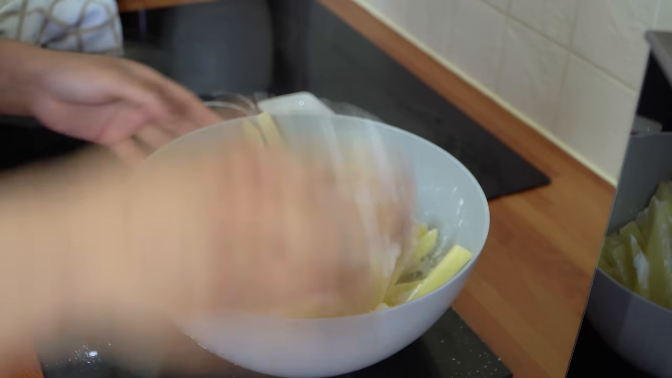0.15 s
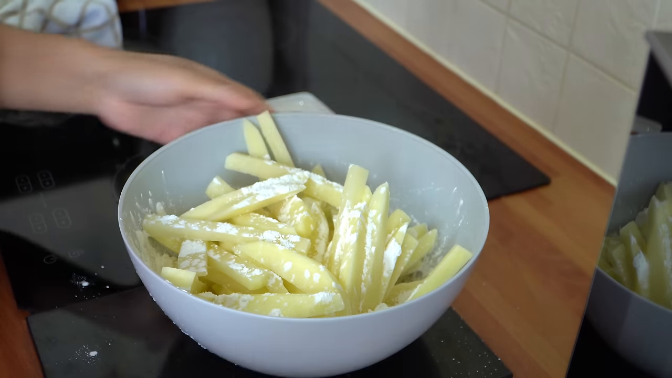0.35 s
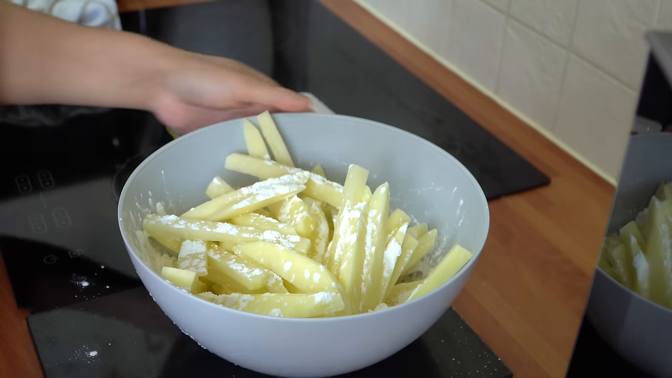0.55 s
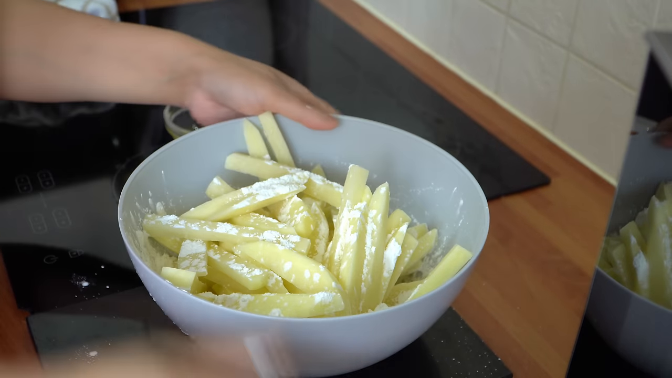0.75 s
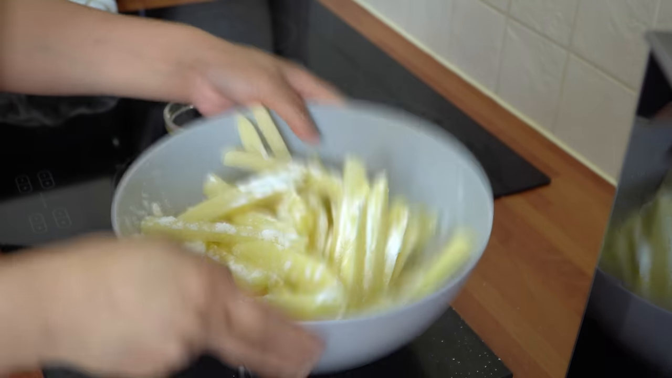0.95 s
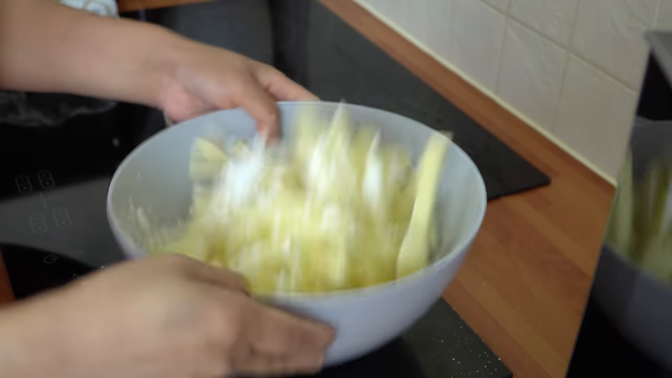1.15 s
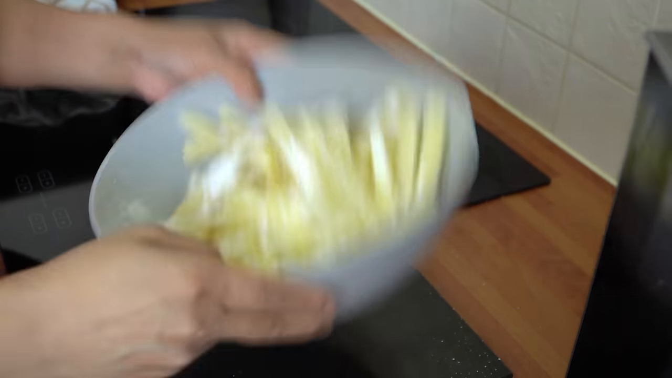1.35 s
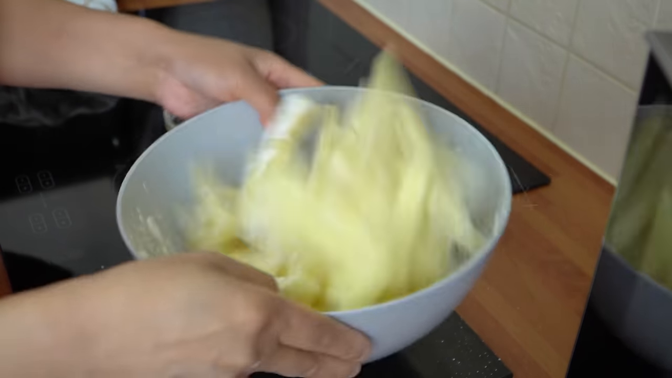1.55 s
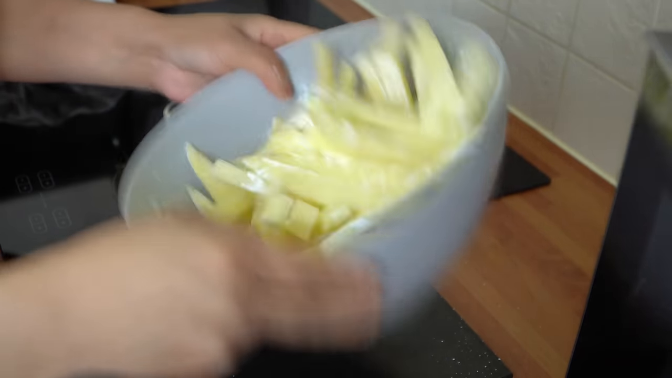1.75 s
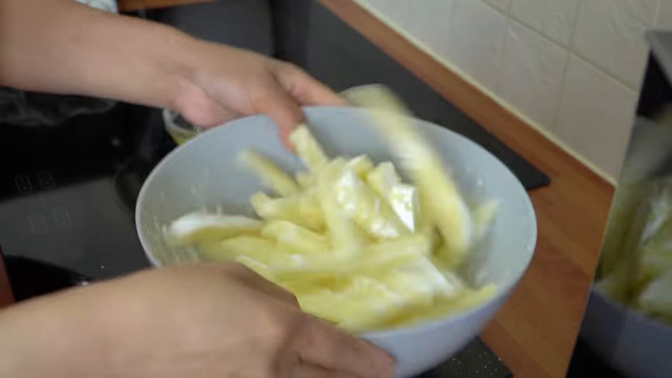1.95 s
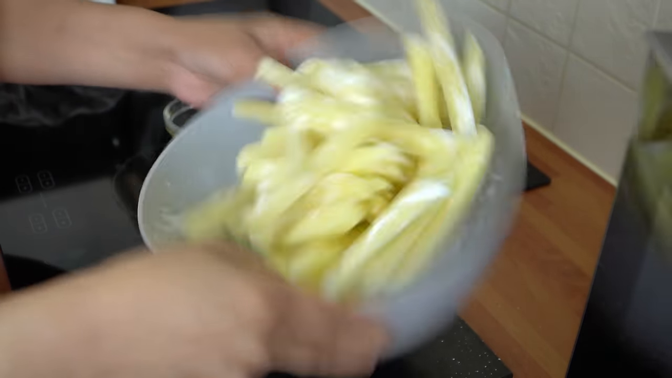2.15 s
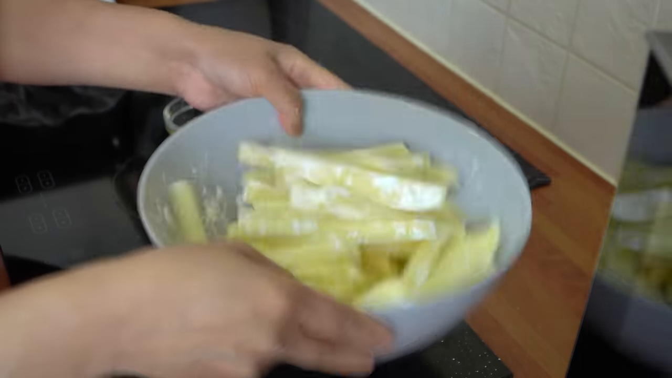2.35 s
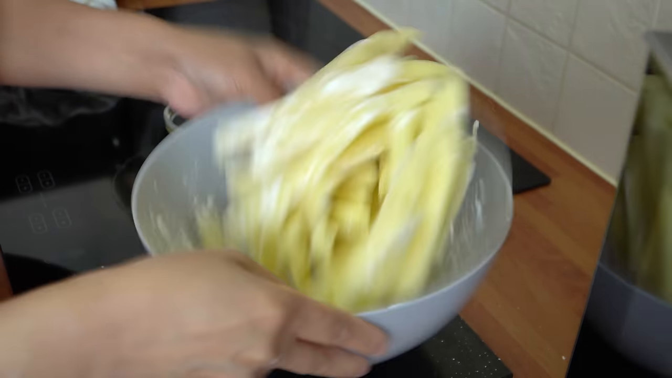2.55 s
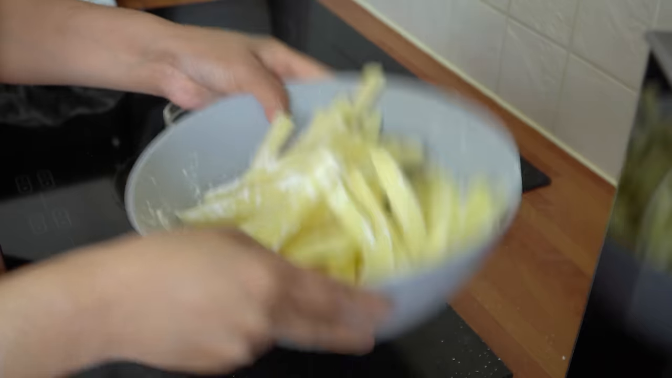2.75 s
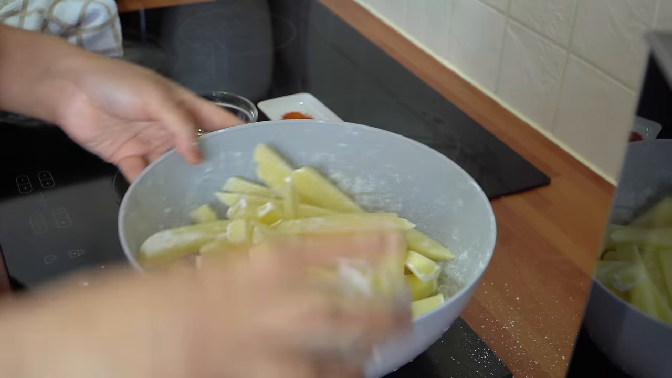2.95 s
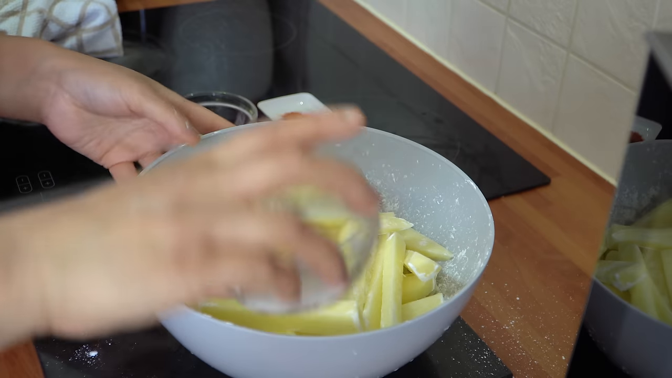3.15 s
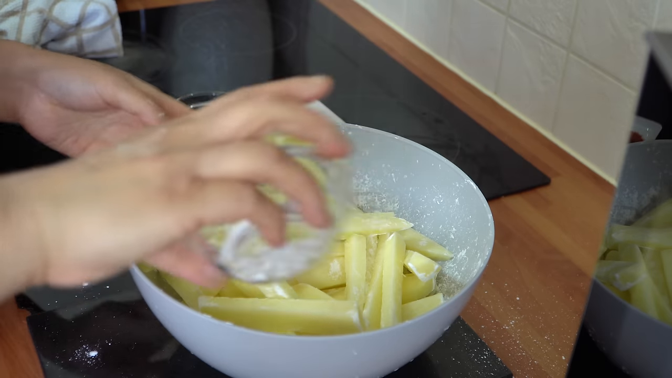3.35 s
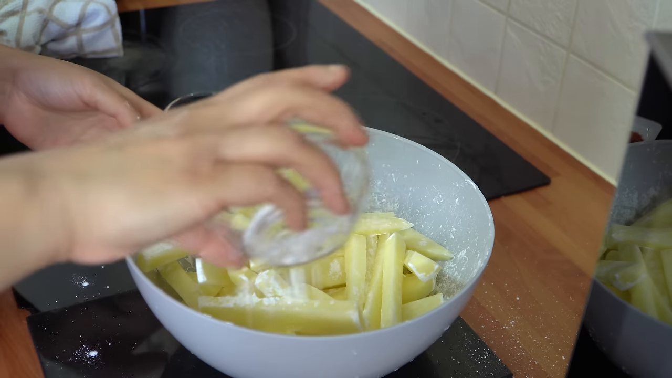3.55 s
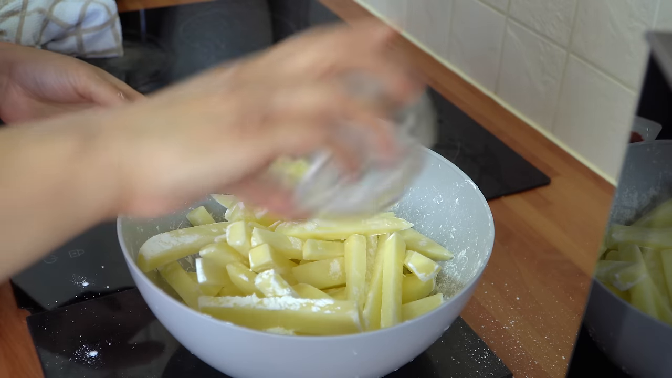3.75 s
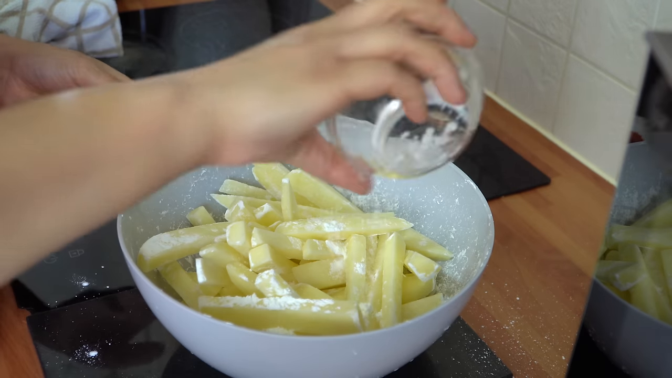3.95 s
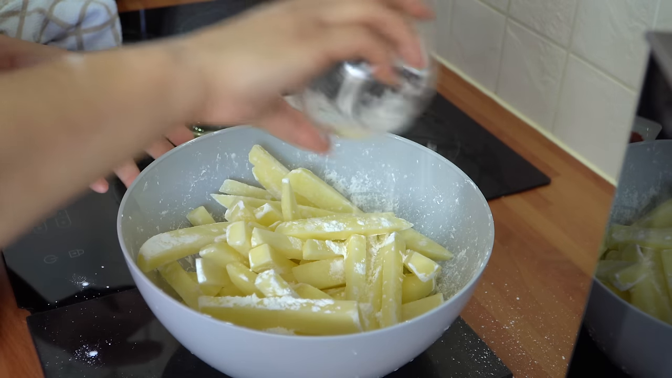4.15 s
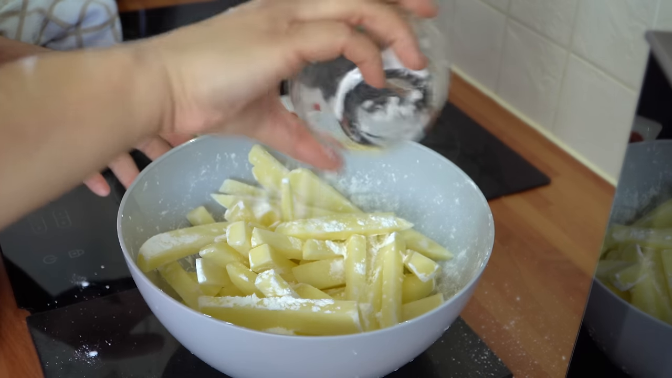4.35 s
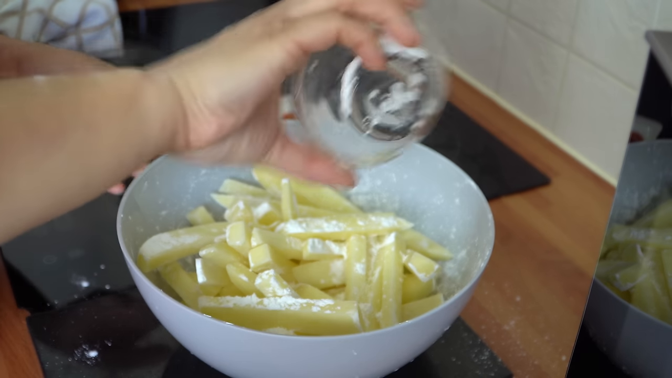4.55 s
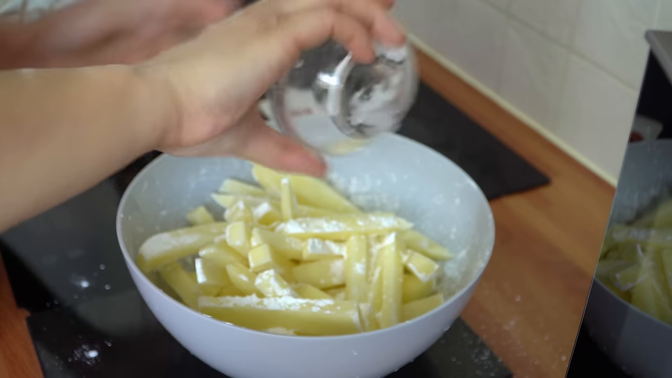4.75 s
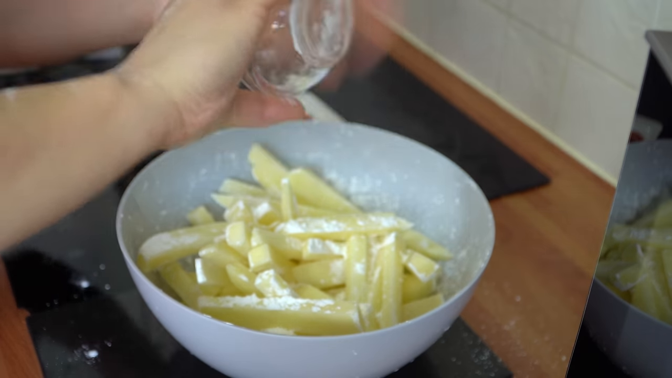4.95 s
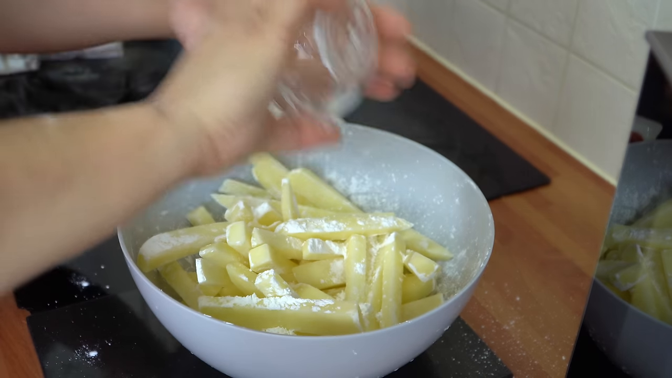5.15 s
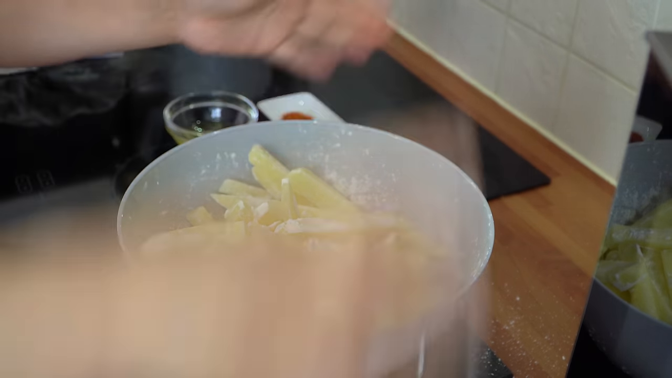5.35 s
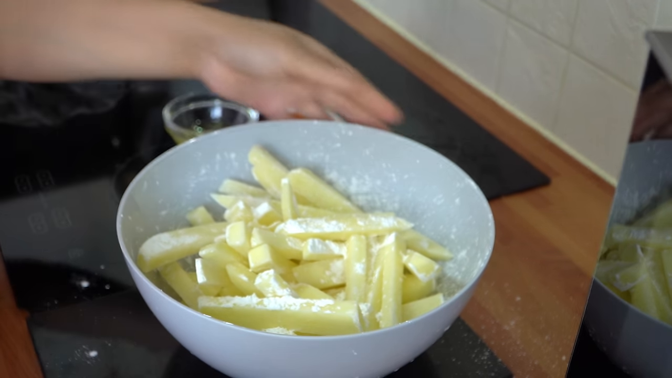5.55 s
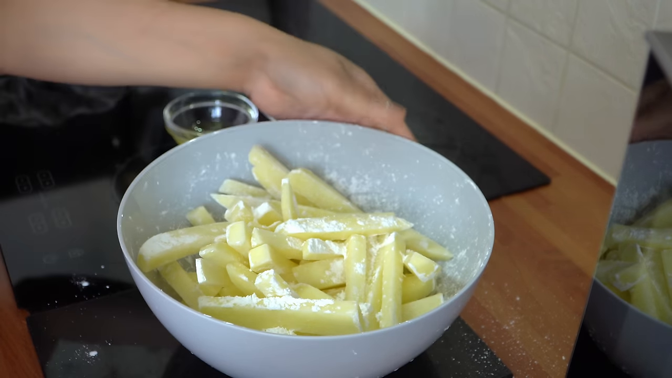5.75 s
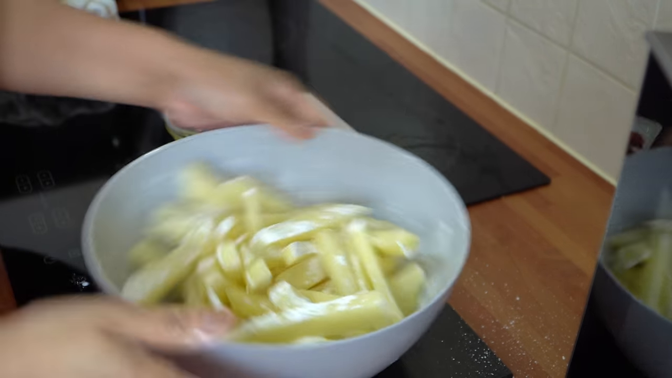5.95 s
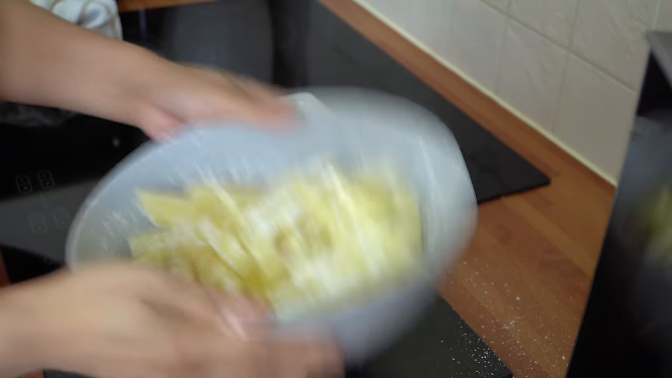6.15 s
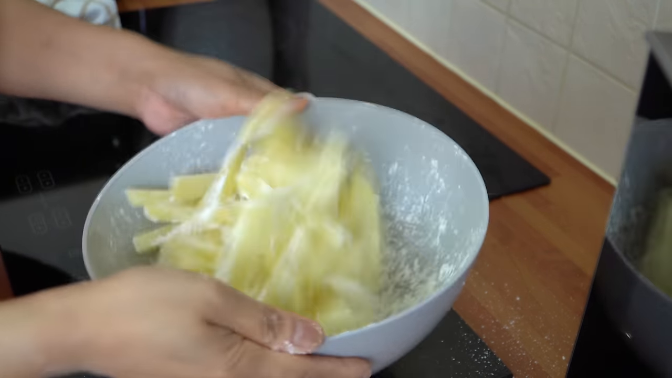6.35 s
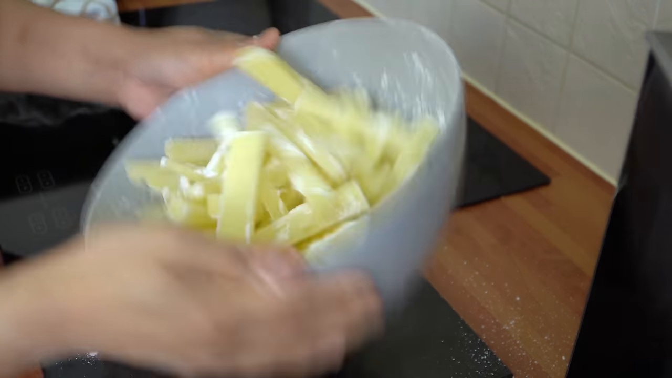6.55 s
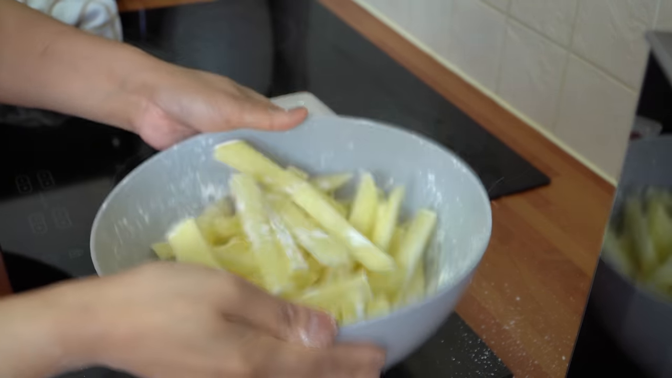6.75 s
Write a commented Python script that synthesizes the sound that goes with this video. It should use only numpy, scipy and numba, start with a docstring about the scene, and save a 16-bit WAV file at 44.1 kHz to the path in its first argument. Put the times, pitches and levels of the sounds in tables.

```python
"""A sleeve rustles over a low kitchen hush; a plastic bowl knocks on the glass hob and judders off it.
Raw floured potato chips are then tossed in it: each toss lands as a slap and a tumble of single chips.
After a pause a little glass flour dish is put down, the bowl knocks on the hob again and two tosses follow.
Blows are short forces filtered by resonant bodies; rubbing is a patter of random tiny contacts filtered
alike. Tiled walls answer, and a limiter flattens the loud blows."""
import sys
import numpy as np
from scipy import signal
from scipy.fft import rfft, irfft, next_fast_len
from scipy.io import wavfile
from scipy.ndimage import minimum_filter1d, map_coordinates
from numba import njit

SR = 44100
rng = np.random.default_rng(int(sys.argv[2]) if len(sys.argv) > 2 else 0)


def log_audio(samples):
    """Write samples as a 16-bit WAV file to the path given in sys.argv[1]."""
    # one column per channel
    frames = np.atleast_2d(samples).T
    # limit to full scale, then quantise
    limited = np.clip(frames, -1, 1)
    pcm = np.round(limited * 32767).astype(np.int16)
    wavfile.write(sys.argv[1], SR, pcm)


N = 303319
TIME = np.arange(N) / SR  # s

# Spectra are relative: each row: frequency in Hz, level in dB.
# Resonances stand on a spectrum: each row: frequency in Hz, width in Hz, lift in dB.
# Strokes swell and fade: each row: time at the height in s, half length in s, level in dB.

# Low room and handling noise. Each row: time in s, level in dB.
HUSH_LEVEL = [(0, -48.5), (2.8, -48), (2.88, -60), (4.75, -61.5), (4.9, -49.5), (5.3, -54.5), (6.88, -49)]
# Spectrum of that noise. Each row: frequency in Hz, level in dB.
HUSH_SPECTRUM = [(20, -7.5), (110, -4), (200, -13), (360, -6.5), (480, -15.5), (1500, -22.5), (9000, -27.5),
                 (16000, -49.5)]
# Spectrum of the even rumble of the house. Each row: frequency in Hz, level in dB.
RUMBLE_SPECTRUM = [(40, -1.5), (130, -4), (600, -43)]

# Reverberation of the kitchen. Each row: frequency in Hz, time to decay by 60 dB in s.
KITCHEN_T60 = [(100, 0.38), (300, 0.29), (700, 0.26), (1900, 0.3), (5000, 0.27), (14000, 0.073)]
LOAD_ROOM_DB, BOWL_ROOM_DB, DISH_ROOM_DB = -10.5, -1.5, -8  # how much of each the walls send back

# The arm moves and its sleeve brushes. Each row: time at the height in s, half length in s, level in dB.
ARM_STROKES = [(.5, 0.13, -49), (1.0, .1, -42), (1.502, .016, -42), (3.28, 0.11, -54), (4.1, 0.13, -60),
               (4.93, .06, -44.5), (5.12, .04, -47.5), (5.36, 0.086, -51), (5.66, 0.075, -49),
               (6.02, 0.045, -44)]
# Spectrum of rubbed cloth. Each row: frequency in Hz, level in dB.
CLOTH_SPECTRUM = [(200, -23), (2000, -17.5), (2600, -10.5), (3150, 3.5), (3900, -7.5), (4700, -6.5),
                  (6000, -11.5), (9000, -12.5), (10500, -21), (16000, -25.5)]
SWING_LEAD_S, SWING_HALF_S = 0.042, 0.05  # the sleeve brushes as the bowl swings up for each toss
FIDGET_DB = -64.5  # the sleeve is never quite still
# Fingers and crumbs tick. Each row: time in s, peak level in dB.
TICK_EVENTS = [(0.111, -32), (0.826, -21), (3.271, -32), (3.533, -33), (3.580, -20), (6.255, -24.5),
               (6.666, -28)]
# Chips and flour shift softly. Each row: time at the height in s, half length in s, level in dB.
LOAD_STROKES = [(.04, 0.12, -51), (.45, 0.074, -64), (2.95, 0.09, -55.5), (3.69, .11, -53.5),
                (4.93, 0.066, -69), (5.98, 0.058, -38.5), (6.13, 0.073, -40.5)]
# Spectrum of the shifting load. Each row: frequency in Hz, level in dB.
LOAD_SPECTRUM = [(100, -27.5), (380, 3.5), (480, -6), (600, 4), (790, -5.5), (2100, -6.5), (5000, -16),
                 (16000, -29)]

# The hand takes the bowl's weight. One row: time in s, peak level in dB.
HAND_PUSH = (1.098, -7)
# Spectrum of the soft palm. Each row: frequency in Hz, level in dB.
PALM_SPECTRUM = [(15, -27), (40, -7), (80, -8.5), (160, -15.5), (350, -12.5), (600, -21), (1200, -38.5),
                 (4000, -74)]

# The flour dish meets the worktop. Each row: time in s, knock in dB, clink in dB.
DISH_CONTACTS = [(5.0201, -7.5, -24), (5.1821, -15.5, -21.5)]
# Spectrum of the worktop. Each row: frequency in Hz, level in dB.
WORKTOP_SPECTRUM = [(30, -7.5), (130, -7), (300, 0), (400, 1), (500, -17), (750, -2), (1000, 2),
                    (1500, -14), (2250, -10), (2800, -37), (16000, -51.5)]
# Spectrum of the glass dish. Each row: frequency in Hz, level in dB.
GLASS_SPECTRUM = [(500, -30.5), (3000, -1.5), (5000, -3), (9000, -6), (11000, -14), (16000, -28)]
# Resonances of the glass dish. Each row: frequency in Hz, width in Hz, lift in dB.
GLASS_RESONANCES = [(5030, 200, 10), (5240, 160, 10), (9260, 220, 10), (9520, 260, 9)]

# The bowl's foot hits or catches on the hob. Each row: time in s, peak level of the first hit in dB.
FOOT_KNOCKS = [(0.5725, 10), (0.759, -11.5), (0.9261, -6), (5.713, 8.5)]
# Spectrum of bowl and glass top together. Each row: frequency in Hz, level in dB.
HOB_SPECTRUM = [(30, -24), (250, -0.5), (480, -2), (700, 1), (1200, 8.5), (1850, -1.5), (2400, -9),
                (3000, -16.5), (3600, -20.5), (5000, -30), (7200, -33), (10000, -38.5), (16000, -54.5)]
# Resonances of bowl and glass top. Each row: frequency in Hz, width in Hz, lift in dB.
HOB_RESONANCES = [(583.6, 40, 7.5), (745, 55, 7.5), (1799, 50, 4.5), (2246, 8.3, 5.5), (4193, 1100, -0.5),
                  (5800, 600, 11), (7220, 710, 8.5), (13060, 600, 8)]
# Spectrum of the juddering foot. Each row: frequency in Hz, level in dB.
JUDDER_SPECTRUM = [(40, -18.5), (200, -9.5), (400, -2), (600, 1), (1250, 1.5), (1600, -14.5), (2500, -20),
                   (16000, -68)]
# The foot bites and grates. Each row: time at the height in s, half length in s, level in dB.
GRATE_STROKES = [(.605, 0.012, -14), (.958, 0.031, -18.5), (5.735, 0.01, -14)]
ROLL_S, ROLL_DB = .001, -4.5  # after each hit the foot rolls along its rim: delay, relative level
DRAG_S, LIFT_S, LIFT_T60_S = .6, 0.9, 0.18  # the foot slides over the glass, then leaves it
JUDDER_DB, JUDDER_RISE_DB = -31.5, 8.5  # the judder grows as the pull quickens

# The bowl swings up and the heap falls back. Each row: landing in s, tumbling time in s,
# strength in dB, flour swish in dB at the landing, sleeve in dB.
TOSS_EVENTS = [(1.198, .105, -2.5, -40.5, -42), (1.551, .11, 1, -31.5, -52), (1.904, .105, -0.5, -34, -47),
               (2.271, 0.11, 4, -44, -51.5), (2.635, .1, 0, -37.5, -48.5), (6.351, .125, -0.5, -39.5, -53),
               (6.702, 0.074, -4.5, -36.5, -47.5)]
# Stray chips hit the bowl hard or on their own. Each row: time in s, thud in dB, clack in dB, snap in dB.
STRAY_CHIPS = [(1.167, -13, -29.5, -31.5), (1.19, -5, -15.5, -22), (1.212, 4, -13.5, -22.5),
               (1.247, 0.5, -15.5, -32), (1.279, -1.5, -1.5, -27), (1.627, -0.5, -0.5, -19),
               (1.693, -7.5, -5, -31), (1.997, 2.5, -4, -16.5), (2.086, -7.5, -16.5, -41),
               (2.367, -9.5, -18, -35.5), (2.415, -18.5, -9.5, -26.5), (2.691, -9, -1.5, -26.5),
               (6.161, -29, -52, -48), (6.334, -16.5, -32, -35.5), (6.366, -28, -2, -18.5),
               (6.407, 4, -5, -22.5), (6.464, -0.5, -3.5, -40), (6.599, -26.5, -26, -33.5),
               (6.688, -15.5, -38, -43), (6.732, -4.5, -5.5, -21.5), (6.766, -16, -4, -41)]
# Spectrum of the loaded bowl under a soft, heavy blow. Each row: frequency in Hz, level in dB.
THUD_SPECTRUM = [(30, -35), (135, -12.5), (200, -19), (300, -12), (450, -6), (610, 0.5), (760, -8.5),
                 (1000, -9), (1400, -13.5), (2500, -33.5), (16000, -87.5)]
# Spectrum of the bowl under a light, slow touch. Each row: frequency in Hz, level in dB.
GRAZE_SPECTRUM = [(60, -24), (300, -14), (550, -1.5), (800, -15), (1500, -29), (16000, -90.5)]
# Spectrum of a blow by a chip's hard end. Each row: frequency in Hz, level in dB.
CLACK_SPECTRUM = [(60, -34), (300, -10), (700, -12.5), (1100, 3), (1400, -1.5), (1850, 10), (2500, -3),
                  (3500, -9), (5000, -25), (9000, -43.5), (16000, -85)]
# Spectrum of floury skins. Each row: frequency in Hz, level in dB.
SNAP_SPECTRUM = [(300, -27.5), (2000, -1.5), (4000, 4.5), (6500, 1), (9000, -7), (16000, -22)]
# Resonances of the bowl. Each row: frequency in Hz, width in Hz, lift in dB.
BOWL_RESONANCES = [(295, 8.9, 6.5), (385.3, 90, 7), (520, 14, 2), (572.5, 73, 3.5), (622, 29, 6.5),
                   (671, 10, 8.5), (836, 8, 0.5), (984, 13, 6), (1082, 120, 3)]
# The heap lands as one; toss strength adds. One row: thud in dB, clack in dB, snap in dB.
SLAP_LEVELS = (4, -7, -21)
# A chip that follows; toss strength, fade and scatter add. One row: thud in dB, clack in dB, snap in dB.
LOOSE_LEVELS = (0, -13, -30.5)
LOOSE_SPREAD_DB, LOOSE_FADE_DB = 1.5, 3.5  # such chips differ in size and weaken over the tumble
CRUSH_DB, CRUSH_S = 8, .018  # the heap presses together as it lands: extra weight, decay time
TUMBLE_DB, TUMBLE_FADE_DB = -14.5, 5  # dull mass of the heap, and its loss over the tumble
CLATTER_DB, CLATTER_FADE_DB = -23, 3.5  # light ends of the chips, and their loss over the tumble
SWISH_FADE_DB, SETTLE_T60_S = 5, 0.23
GRAZE_S, GRAZE_DB = 0.012, -23  # the lowest chips touch softly just ahead of the heap

LIMITER_ATTACK_S, LIMITER_RELEASE_S, CLIP_HARDNESS = 0.0013, 0.052, 4.1
TOP_HZ = 16000


def amp(db):
    """Logarithmic level: decibels become an amplitude gain."""
    return 10 ** (np.asarray(db) / 20)


def unit(x):
    """Normalisation of power: x at rms 1."""
    return x / np.sqrt(np.mean(x ** 2) + 1e-20)


def along(points, hz):
    """Interpolation of (Hz, value) points on a logarithmic frequency axis."""
    f, v = np.transpose(points)
    return np.interp(np.log(hz + 1), np.log(f + 1), v)


def level_curve(rows):
    """Slow modulation: gain along (s, dB) points, silent outside them."""
    s, db = np.transpose(rows)
    return amp(np.interp(TIME, s, db)) * (TIME >= s[0]) * (TIME <= s[-1])


def strokes(rows):
    """Addition of power: gain of smooth bell-shaped strokes (s, half length s, dB)."""
    power = sum(amp(db) ** 2 * np.exp(-((TIME - s) / half) ** 2) for s, half, db in rows)
    return np.sqrt(power)


def wobble(rate):
    """Random modulation: a smooth curve through chance knots, rate knots a second."""
    knots = rng.standard_normal(int(TIME[-1] * rate) + 4)
    return map_coordinates(knots, [TIME * rate])


def body(shape, modes=(), size=8192):
    """Minimum phase: a spectrum with resonances becomes a causal impulse response of peak 1."""
    hz = np.fft.rfftfreq(size, 1 / SR)
    resonances_db = sum(lift / (1 + (2 * (hz - f) / width) ** 2) for f, width, lift in modes)
    db = along(shape, hz) + resonances_db
    # folding the cepstrum onto positive times makes the response causal
    cepstrum = irfft(np.log(amp(db)))[:size // 2]
    cepstrum[1:] *= 2
    response = irfft(np.exp(rfft(cepstrum, size)))[:size // 2]
    return response / np.abs(response).max()


def ring(force, response):
    """Linear superposition: a body's answer to a force is their convolution."""
    return signal.oaconvolve(force, response)[:N]


def rub(force, response):
    """Response of unit energy: a running random force keeps its rms level."""
    return ring(force, response / np.linalg.norm(response))


def blows(times, db):
    """Impulsive excitation: one single-sample force for each contact."""
    samples = np.round(np.atleast_1d(times) * SR).astype(int)
    return np.bincount(samples, amp(np.atleast_1d(db)), N)[:N]


def patter(rate, spread_db):
    """Random excitation: tiny contacts of uneven size and sign, about rate a second, rms 1."""
    sizes = amp(spread_db * np.clip(rng.standard_normal(N), -2, 2))
    signed = sizes * rng.choice([-1, 1], N)
    return unit(signed * (rng.random(N) < rate / SR))


def strikes(times, db, shape, modes, touch_s, shift, size=4096):
    """Extended contact: a brief uneven force rolls along an edge, and its spot shifts the body's colour."""
    out, t = np.zeros(N + size), TIME[:size // 4]
    chances = rng.standard_normal((len(times), size // 4))
    for s, level, chance in zip(times, db, chances):
        force = chance * t * np.exp(-t / touch_s)
        # the spectrum slides in frequency, the resonances stay
        colour = np.multiply(shape, [np.exp(shift * chance[0]), 1])
        sound = signal.fftconvolve(force, body(colour, modes))[:size]
        out[round(s * SR):][:size] += amp(level) * sound / np.abs(sound).max()
    return out[:N]


def hush():
    """Filtered noise: the low noise of the kitchen over the steady rumble of the house."""
    noise = level_curve(HUSH_LEVEL) * rub(rng.standard_normal(N), body(HUSH_SPECTRUM))
    rumble = amp(-64.0) * rub(rng.standard_normal(N), body(RUMBLE_SPECTRUM))
    return noise + rumble


def kitchen(x, count=24):
    """Diffuse reverberation of tiled walls, as exponentially decaying noise."""
    wet = np.zeros(N + SR)
    # a fresh random tail for each short stretch keeps the reverberation evenly coloured
    for part in np.array_split(np.arange(N), count):
        hz, t, z = signal.stft(rng.standard_normal(SR // 2), SR, nperseg=256)
        decay = amp(-60 * t / along(KITCHEN_T60, hz)[:, None])
        tail = signal.istft(z * decay, SR, nperseg=256)[1]
        tail *= 1 - np.exp(-TIME[:len(tail)] / 0.00067)  # reflections take a moment to build up
        answer = signal.fftconvolve(x[part], tail / np.linalg.norm(tail))
        wet[part[0]:][:len(answer)] += answer
    return wet[:N]


def handling():
    """Friction noise of sleeve and shifting load, with small impulsive ticks."""
    swings = [(s - SWING_LEAD_S, SWING_HALF_S, sleeve_db) for s, *_, sleeve_db in TOSS_EVENTS]
    fidget = amp(FIDGET_DB + 2.5 * wobble(rate=5))
    motion = np.hypot(strokes(ARM_STROKES + swings), fidget)
    rustle = motion * amp(3 * wobble(rate=9)) * patter(rate=12000, spread_db=11.5)
    sleeve = rub(rustle, body(CLOTH_SPECTRUM))
    crumbs = rub(amp(-62.5) * patter(rate=100, spread_db=5), body(SNAP_SPECTRUM))
    ticks = ring(blows(*np.transpose(TICK_EVENTS)), body(SNAP_SPECTRUM))
    sliding = rub(strokes(LOAD_STROKES) * patter(rate=9600, spread_db=7), body(LOAD_SPECTRUM))
    return sleeve + crumbs + ticks + sliding


def bump():
    """Response without resonances: a soft push of the hand, with no ring."""
    return ring(blows(*HAND_PUSH), body(PALM_SPECTRUM))


def dish():
    """Damped resonance: the glass dish lands on one edge, then the other, held by the fingers."""
    s, knock_db, clink_db = np.transpose(DISH_CONTACTS)
    knocks = ring(blows(s, knock_db), body(WORKTOP_SPECTRUM))
    clinks = strikes(s, clink_db, GLASS_SPECTRUM, GLASS_RESONANCES, touch_s=0.00072, shift=0)
    return knocks + clinks


def bowl_on_hob():
    """Impact and stick-slip: the bowl rocks onto its foot, judders over the glass, catches and is lifted."""
    s, db = np.transpose(FOOT_KNOCKS)
    hob = body(HOB_SPECTRUM, HOB_RESONANCES)
    knocks = ring(blows(s, db), hob)
    rolls = strikes(s + ROLL_S, db + ROLL_DB, HOB_SPECTRUM, HOB_RESONANCES, touch_s=.001, shift=0)
    pull = np.clip((TIME - DRAG_S) / (LIFT_S - DRAG_S), 0, 1)
    lift_db = -60 * np.maximum(TIME - LIFT_S, 0) / LIFT_T60_S
    judder = (TIME >= DRAG_S) * amp(JUDDER_DB + JUDDER_RISE_DB * pull + lift_db)
    # the foot sticks and slips, so the judder comes in uneven spurts
    grip = amp(4.5 * wobble(rate=60))
    slip_force = judder * grip * patter(rate=1300, spread_db=1)
    slips = rub(slip_force, body(JUDDER_SPECTRUM, HOB_RESONANCES))
    grit = rub(strokes(GRATE_STROKES) * patter(rate=3800, spread_db=0.5), hob)
    return knocks + rolls + slips + grit


def loose_chips(count=7):
    """Scattered arrivals: rows (s, thud dB, clack dB, snap dB) at uneven intervals after each landing."""
    rows = []
    for s, length, db, *_ in TOSS_EVENTS:
        progress = (np.arange(count) + .5 + rng.random(count)) / count
        size_db = db - LOOSE_FADE_DB * progress
        scatter_db = LOOSE_SPREAD_DB * 2 * (rng.random((count, len(LOOSE_LEVELS))) - .5)
        levels_db = size_db[:, None] + scatter_db + LOOSE_LEVELS
        rows.extend(np.column_stack([s + length * progress, levels_db]))
    return rows


def chips():
    """Discrete impacts on the bowl: each landing's slap, the chips that follow it, and the strays."""
    slaps = [(s, *np.add(SLAP_LEVELS, db)) for s, _, db, *_ in TOSS_EVENTS]
    s, thud_db, clack_db, snap_db = np.transpose(slaps + loose_chips() + STRAY_CHIPS)
    thuds = strikes(s, thud_db, THUD_SPECTRUM, BOWL_RESONANCES, touch_s=0.00089, shift=0.061)
    clacks = strikes(s, clack_db, CLACK_SPECTRUM, BOWL_RESONANCES, touch_s=0.002, shift=0.14)
    snaps = strikes(s, snap_db, SNAP_SPECTRUM, (), touch_s=0.0026, shift=0.12)
    return thuds + clacks + snaps


def heap():
    """Dense impacts merge into noise: the heap grazes the bowl, tumbles, clatters, settles; flour swishes."""
    early, heavy, light, floury = np.zeros((4, N))
    for s, length, db, swish_db, _ in TOSS_EVENTS:
        progress = np.clip((TIME - s) / length, 0, 1)
        settling = np.maximum(TIME - s - length, 0)
        fall = (TIME >= s) * amp(-60 * settling / SETTLE_T60_S)
        early += (TIME >= s - GRAZE_S) * (TIME < s) * amp(db + GRAZE_DB)
        crush_db = CRUSH_DB * np.exp(-np.maximum(TIME - s, 0) / CRUSH_S)
        heavy += fall * amp(db + crush_db + TUMBLE_DB - TUMBLE_FADE_DB * progress ** 2)
        light += fall * amp(db + CLATTER_DB - CLATTER_FADE_DB * progress)
        floury += fall * amp(swish_db - SWISH_FADE_DB * progress)
    graze = rub(early * patter(rate=900, spread_db=3.5), body(GRAZE_SPECTRUM, BOWL_RESONANCES))
    tumble = rub(heavy * patter(rate=330, spread_db=4), body(THUD_SPECTRUM, BOWL_RESONANCES))
    clatter = rub(light * patter(rate=1200, spread_db=2.5), body(CLACK_SPECTRUM, BOWL_RESONANCES))
    swish = rub(floury * patter(rate=3000, spread_db=8.5), body(SNAP_SPECTRUM))
    return graze + tumble + clatter + swish


def scene():
    """Superposition of all sources and the answer of the room."""
    small = handling() + bump()
    glass = dish()
    bowl = bowl_on_hob()
    load = heap() + chips()
    to_walls = amp(LOAD_ROOM_DB) * (load + small) + amp(BOWL_ROOM_DB) * bowl + amp(DISH_ROOM_DB) * glass
    return (hush() + kitchen(to_walls) + small + glass + bowl + load)[None]


@njit
def follow(level, attack, release):
    """Envelope following with two time constants in samples: fast rise, slow fall."""
    out, held = np.empty_like(level), 0.0
    for i in range(len(level)):
        held += (level[i] - held) / (attack if level[i] > held else release)
        out[i] = held
    return out


def record(dry):
    """Dynamic compression: a limiter ducks loud blows, peaks saturate, and the top of the band is cut."""
    peaks = -minimum_filter1d(-np.abs(dry[0]), size=64)  # running maximum
    envelope = follow(peaks, LIMITER_ATTACK_S * SR, LIMITER_RELEASE_S * SR)
    ducked = dry / np.maximum(envelope, 1)
    limited = ducked / (1 + np.abs(ducked) ** CLIP_HARDNESS) ** (1 / CLIP_HARDNESS)
    size = next_fast_len(N + SR // 2)
    passed = np.fft.rfftfreq(size, 1 / SR) < TOP_HZ
    return irfft(rfft(limited, size) * passed, size)[:, :N]


dry = scene()
out = record(dry)
log_audio(out)
```